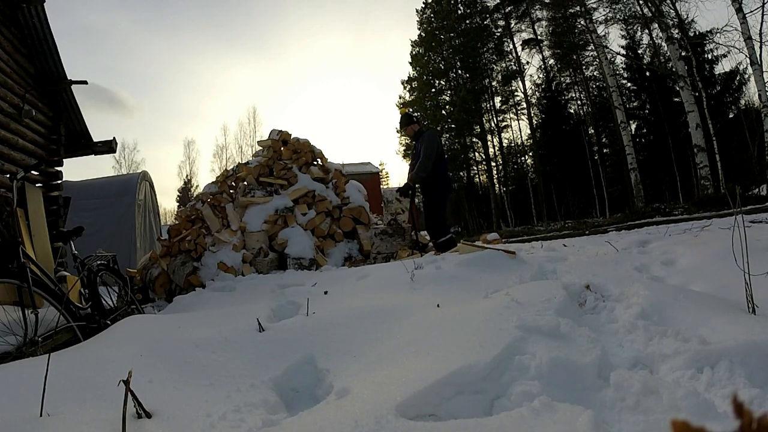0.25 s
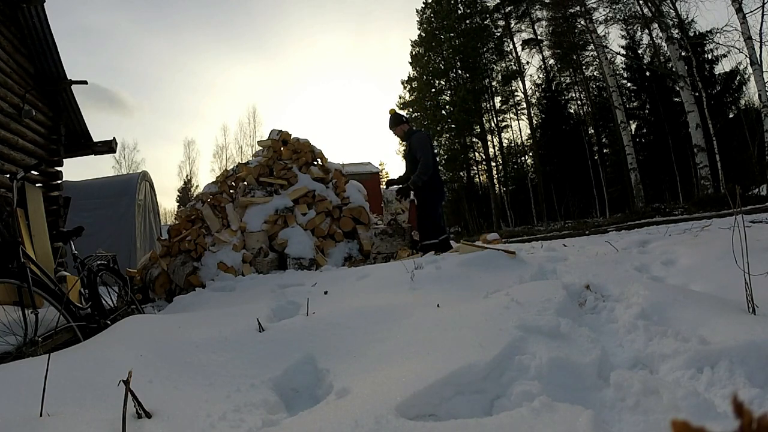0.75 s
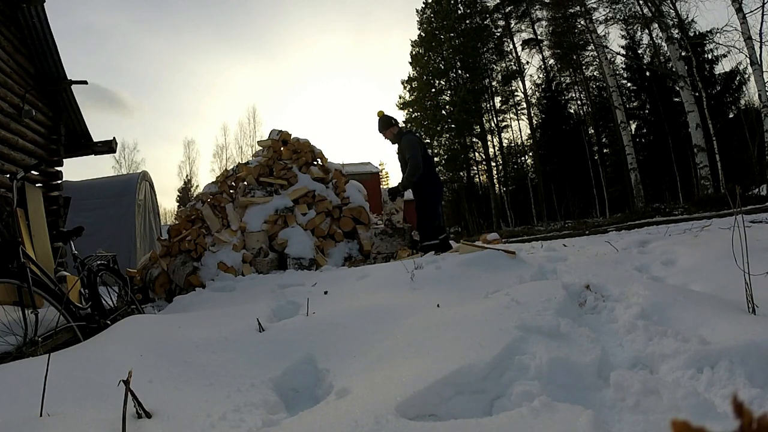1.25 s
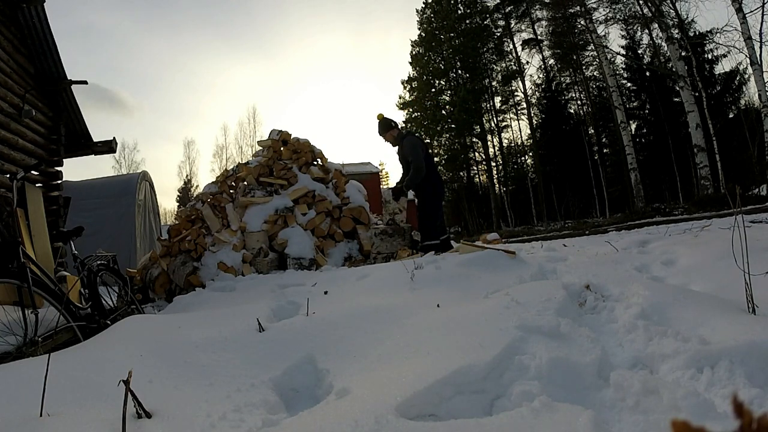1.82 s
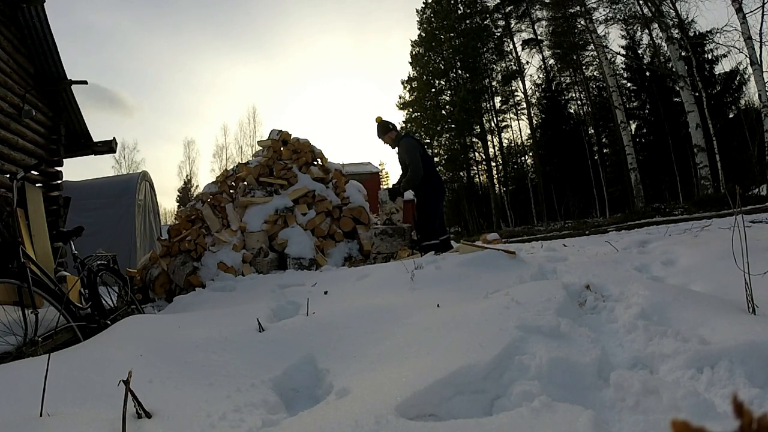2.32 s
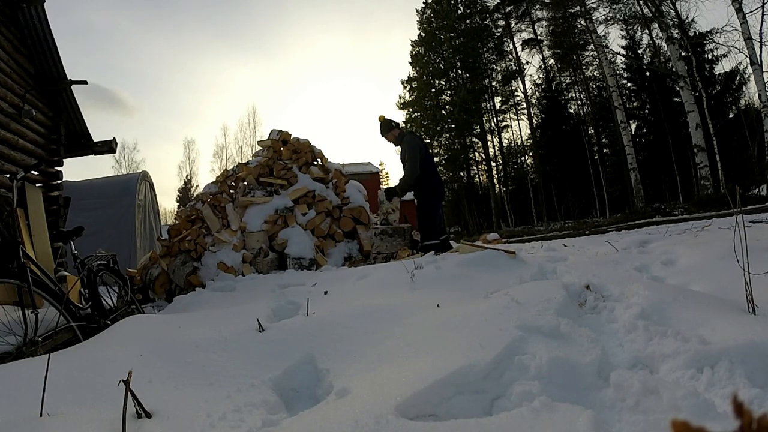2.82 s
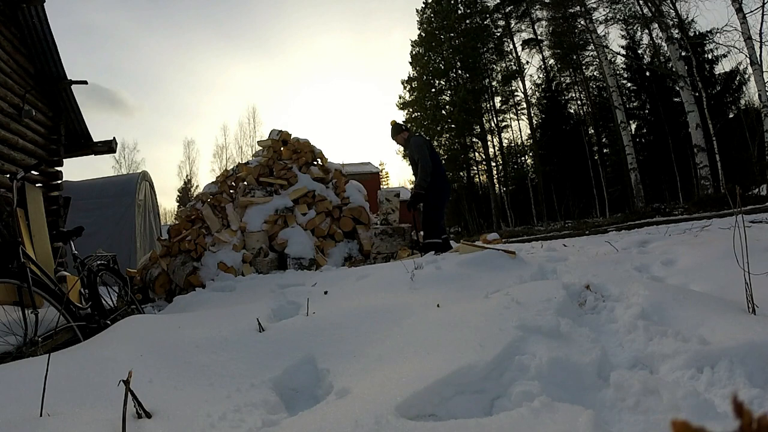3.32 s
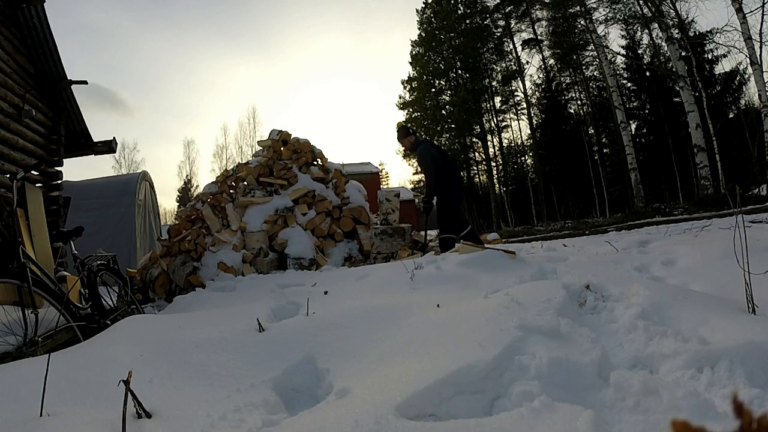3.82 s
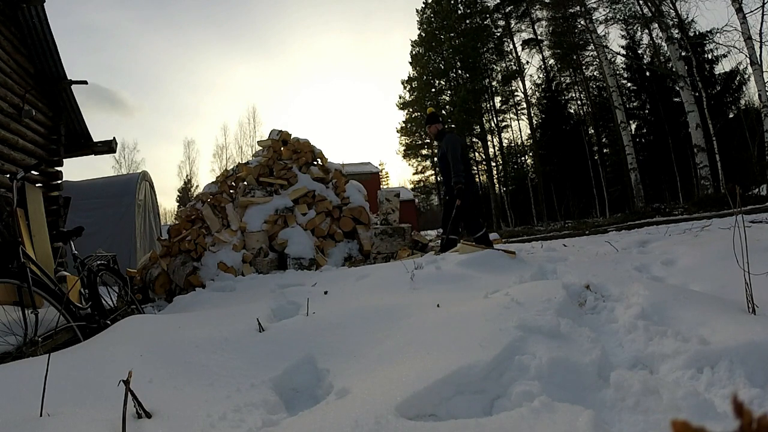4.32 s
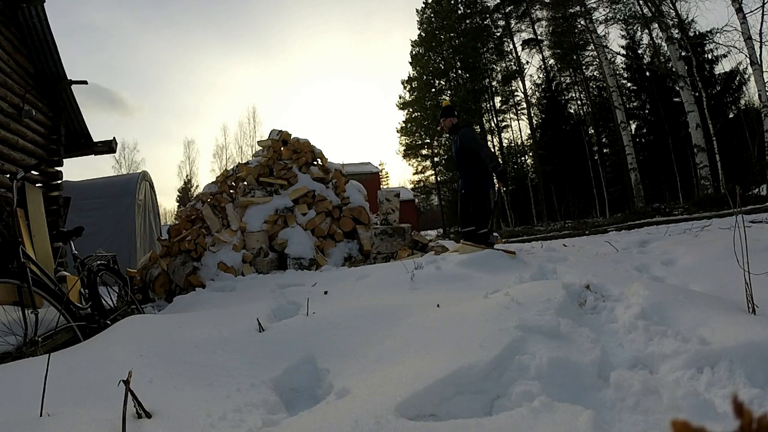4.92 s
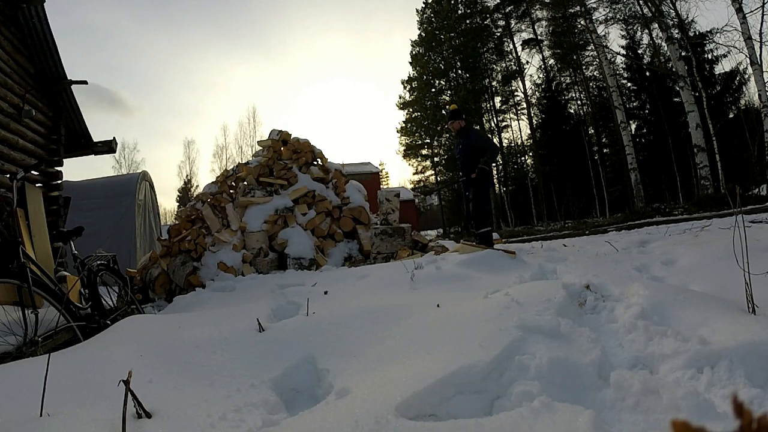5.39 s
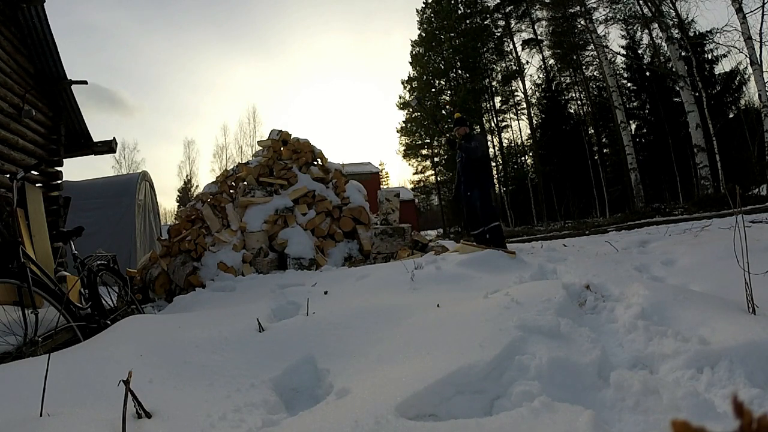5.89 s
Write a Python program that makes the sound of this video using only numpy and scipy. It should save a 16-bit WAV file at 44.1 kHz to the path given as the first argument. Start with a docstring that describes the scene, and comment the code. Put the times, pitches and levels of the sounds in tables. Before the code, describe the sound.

A quiet outdoor wash of air with a faint low stir of wind runs throughout. In the first second and a half there are only soft bumps and scuffs in snow and a few thin, falling bird chirps. At about 1.6 seconds an axe splits a log some metres away: one sharp, tearing crack with a brief woody ring and a short echo off the trees. At 1.8 a heavy piece thuds deeply into snow. Softer bumps, wood ticks and scuffs follow until 3 seconds, with a few muffled boot steps between 4 and 5. From 1.8 to 5 seconds a small bird faintly alternates a clear high whistle with a buzzy note, five times over. Distant, lower fluted notes come between 2.4 and 3.6. From 5 seconds a very faint twitter and thin high peeps carry on to the end, just after 6.

```python
"""A snowy yard at the edge of a forest, where an axe splits a log some metres away.
The wood cracks, tears and rings, then heavy pieces thud into the snow amid soft scuffs and bumps.
A small bird alternates a whistle with a buzz; others add thin chirps, a twitter and far fluting,
all gliding near-sine tones. Trunks scatter a short tail over a quiet bed of air."""
import sys
import numpy as np
from scipy import signal
from scipy.fft import rfft, irfft
from scipy.io import wavfile

SR = 44100
rng = np.random.default_rng(int(sys.argv[2]) if len(sys.argv) > 2 else 0)


def wav_record(signal):
    """Record a signal, one row per channel, as 16-bit PCM in the file named by sys.argv[1]."""
    frames = np.transpose(np.atleast_2d(signal))
    bounded = np.clip(frames, -1, 1)
    # unit amplitude maps onto the largest positive 16-bit level
    quanta = np.round(bounded * 32767).astype(np.int16)
    wavfile.write(sys.argv[1], SR, quanta)


N = 271215

# The split (blade bites, log bursts, halves part, last fibres rip twice): delay_s, level_db, decay_s
SPLIT_STAGES = [(0, -20.5, 0.001), (.0011, -16.5, 0.0012), (.0023, -30, 0.004), (0.0106, -28.5, .005),
                (.014, -33, 0.0041)]
# Ticks of loose wood: start_s, level_db
WOOD_TICKS = [(1.458, -53), (1.816, -49.5), (2.223, -51), (2.897, -55)]
# Tone of cracking wood: frequency_hz, gain_db
CRACK_EQ = [(100, -17), (430, 4), (700, -16.5), (1080, -3.5), (1350, -7), (1650, -5.5), (2100, 1.5),
            (2400, -1.5), (3400, 1), (4400, -11), (5400, -5.5), (7200, -13), (9000, -20), (15000, -38)]
# Ring of the log and axe: pitch_hz, level_db, t60_s
LOG_MODES = [(397.5, -1.5, 0.19), (492, 4.5, 0.053), (1074, 1.5, 0.088), (1131, 3, 0.063), (1603, 1, 0.064),
             (2012, 3.5, 0.049), (2150, -13, 0.066), (2280, -10, 0.036), (2770, -17, 0.045),
             (2740, -30, 0.039), (2770, 1, 0.033), (3170, -9, 0.034), (3430, -15, 0.036), (3380, -7, .04),
             (3480, -9, 0.034), (3820, -12, 0.04), (5130, -6, 0.097), (5800, -4, 0.055), (6966, -5, 0.063)]
# Wood and boots landing in snow: start_s, level_db, first_pitch_hz
LANDINGS = [(.214, -53, 58), (.429, -42, 211), (.441, -35, 62.5), (0.705, -51, 274), (1.412, -46, 95),
            (1.587, -44, 120), (1.8161, -18, 129), (2.014, -36, 55.7), (2.296, -40.5, 112),
            (2.345, -37, 134), (2.547, -38.5, 88), (2.877, -46, 86), (2.975, -48.5, 93),
            (3.984, -40.5, 151), (4.542, -47.5, 52.5), (4.771, -51, 50), (5.098, -47, 40),
            (5.748, -56, 250)]
# Tone of snow packed by an impact: frequency_hz, gain_db
PACKING_EQ = [(30, -32), (150, -13), (240, -1), (330, -28), (420, 9.5), (530, -10.5), (750, -5.5),
              (1000, -52), (1500, -41), (6000, -28), (15000, -48)]
# Scuffs of wood, snow and clothing: centre_s, level_db, half_width_s, powder_share
SCUFF_SWELLS = [(.244, -64.5, 0.054, 0.4), (1.002, -61.5, 0.019, 0.94), (1.16, -62.5, 0.17, 0.01),
                (1.455, -53, 0.024, 0.04), (1.585, -51.5, 0.011, 0.03), (1.847, -58, 0.043, .07),
                (2.02, -56.5, 0.073, 0.16), (2.312, -58.5, 0.063, 0.18), (2.566, -58, 0.027, 0.53),
                (6.095, -61, 0.017, 1)]
# Tone of a scuff's crunch: frequency_hz, gain_db
CRUNCH_EQ = [(100, 6.5), (420, -7), (800, 3), (1100, -9.5), (1400, -5), (2200, -3.5), (3300, -5),
             (4300, -11), (6200, -19), (9000, -24), (15000, -31)]
# Tone of powdery hiss: frequency_hz, gain_db
POWDER_EQ = [(100, -10), (1000, -1.5), (2500, -4), (6000, -2.5), (9000, -10), (15000, -20.5)]
# The near bird's clear notes: start_s, length_s, level_db, pitch_hz
WHISTLE_NOTES = [(1.765, 0.17, -55.5, 3880), (2.422, 0.19, -55, 3790), (3.048, 0.23, -59.5, 3845),
                 (3.702, 0.18, -54, 3766), (4.402, 0.16, -51, 3743)]
# Its buzzed answers: start_s, length_s, level_db, pitch_hz
BUZZ_NOTES = [(2.075, 0.19, -57, 4750), (2.719, 0.18, -58, 4640), (3.348, 0.197, -58, 4650),
              (4.058, 0.16, -54.5, 4844), (4.723, 0.16, -54.5, 4944)]
# Thin falling chirps: start_s, length_s, level_db, pitch_hz
CHIRP_NOTES = [(.445, 0.096, -69, 6980), (0.613, .12, -69.5, 6560), (.805, .05, -76, 6100),
               (4.366, .093, -73, 7100), (4.526, 0.1, -71, 6700), (5.218, 0.11, -70, 6850),
               (5.415, 0.089, -77, 7550), (5.417, 0.056, -74, 6250), (5.59, .107, -75, 7270),
               (5.77, .087, -78, 6860)]
# Arched peeps: start_s, length_s, level_db, pitch_hz, glide_hz, arch_hz
PEEP_NOTES = [(5.046, 0.075, -69, 7000, 5, 250), (5.845, 0.025, -65, 8130, -300, 700),
              (6.098, 0.027, -58, 7020, 1900, 496)]
# Far fluted notes: start_s, level_db, pitch_hz, glide_hz
FLUTED_NOTES = [(2.43, -70.5, 2190, -170), (2.738, -63.5, 1930, -160), (3.109, -70, 2780, 110),
                (3.283, -72, 2700, 50), (3.53, -67.5, 2080, 140)]
# Decay of the forest's tail: frequency_hz, t60_s
FOREST_DECAY = [(100, .3), (1000, 0.69), (4000, 0.5), (8000, 0.34), (15000, 0.11)]
# Tone of the far wash of air: frequency_hz, gain_db
AIR_EQ = [(12, -35), (20, 0.5), (49, 2), (90, -0.5), (597, -8), (3750, -19.5), (4810, -21.5),
          (13900, -36.5), (15500, -42)]


def axe(chop_s=1.606, snap_db=11, fibre_db=-3, ring_db=-33, tick_decay_s=0.0052):
    """Each fracture is one snap and a burst of tearing fibres, and sets the log ringing."""
    t = np.arange(SR // 4) / SR
    snaps, tearing = np.zeros((2, N))
    cracks = [(chop_s + delay, db, decay) for delay, db, decay in SPLIT_STAGES]
    cracks += [(s, db, tick_decay_s) for s, db in WOOD_TICKS]
    for s, db, decay in cracks:
        add(snaps, s, amp([db + snap_db]) / (1 + (decay / .004) ** 2))  # slow tears barely snap
        add(tearing, s, amp(db + fibre_db) * np.exp(-t / decay))
    crack = signal.oaconvolve(snaps + tearing * rng.standard_normal(N), tight_impulse(CRACK_EQ))[:N]
    return crack + amp(ring_db) * signal.oaconvolve(snaps, log_ring())[:N]


def log_ring():
    """One tap on the log: its modes ring and quickly die."""
    t = np.arange(SR // 4) / SR
    return sum((-1) ** k * amp(db - 60 * t / t60) * np.sin(2 * np.pi * hz * t)
               for k, (hz, db, t60) in enumerate(LOG_MODES))


def thuds(snow_hz=50, knock_hz=218, knock_db=-8, packing_db=-20, rock_hz=93.3, rock_db=-21.5):
    """A weight sinks unevenly into snow: a sagging low boom, hollow knock, muffled crunch, rocking."""
    t = np.arange(SR // 2) / SR
    lows, pressure = np.zeros((2, N))
    knock = amp(knock_db) * np.exp(-t / 0.016) * np.sin(2 * np.pi * knock_hz * t)
    knock *= 1 - np.exp(-t / 0.0031)
    rock_swell = amp(rock_db) * t / 0.068 * np.exp(1 - t / 0.068)
    knots = t[::SR // 200]
    for s, db, first_hz in LANDINGS:
        firmness = first_hz / 140  # harder landings start higher, rise faster, knock and crunch more
        punch = firmness ** 2.03
        age = t / 0.011 * firmness ** 0.61  # 1 at the boom's peak
        sunk = 1 - np.exp(-(age / 2.4) ** 3.56)  # the pitch holds, then sags
        last_hz = min(first_hz, max(0.31 * first_hz, snow_hz))  # no sag below the snow's own pitch
        give = np.interp(t, knots, rng.standard_normal(len(knots)))
        hz = (first_hz + (last_hz - first_hz) * sunk) * np.exp(0.14 * (0.52 + sunk) * give)
        boom = (age * np.exp(1 - age)) ** 0.64 * np.sin(phase_of(hz))
        rocking = rock_swell * np.sin(phase_of(rock_hz * np.exp(0.24 * give)))
        add(lows, s, amp(db) * (boom + punch * knock + rocking))
        add(pressure, s, amp(db + packing_db) * punch * np.exp(-age) * (1 - np.exp(-t / 0.00061)))
    return lows + pressure * noise(PACKING_EQ)


def scuffs(grain_db=2.5, wood_db=-3):
    """Short swells of grainy crunch, rubbed wood and powdery hiss."""
    t, out = np.arange(N) / SR, np.zeros(N)
    rubbed = unit_rms(signal.oaconvolve(rng.standard_normal(N), log_ring())[:N])
    crunch = unit_rms(noise(CRUNCH_EQ) + amp(wood_db) * rubbed)
    powder = noise(POWDER_EQ)
    for s, db, half_width, share in SCUFF_SWELLS:
        swell = amp(db) * np.exp(-((t - s) / half_width) ** 2 / 2)
        out += swell * (np.sqrt(1 - share) * crunch + np.sqrt(share) * powder)
    return out * unit_rms(amp(grain_db * drift(530)))


def bird_note(length_s, db, pitch_hz, glide_hz=0, arch_hz=0, hook_hz=0, scoop_hz=0, trill_depth_hz=0,
              trill_rate_hz=235, waver=.002, flutter_db=1, fade_db=0, taper=.35, octave_db=-38):
    """A bird's voice: a near sine on a gliding, arched pitch; a fast uneven trill makes it buzz."""
    t = np.arange(int(length_s * SR)) / SR
    progress = t / t[-1]
    pitch_jitter, level_jitter, rate_jitter, depth_jitter = (
        np.interp(progress, np.linspace(0, 1, 24), row) for row in rng.standard_normal((4, 24)))
    hz = pitch_hz + glide_hz * (progress - .5) - arch_hz * (2 * progress - 1) ** 2
    hz -= scoop_hz * np.exp(-t / 0.0052) + hook_hz * progress ** 20  # scoop in, hook down at the end
    trill = (1 + .25 * depth_jitter) * np.sin(phase_of(trill_rate_hz * (1 + .07 * rate_jitter)))
    phase = phase_of(hz * (1 + waver * pitch_jitter) + trill_depth_hz * trill)
    tone = np.sqrt(2) * (np.sin(phase) + amp(octave_db) * np.sin(2 * phase))
    level = amp(db + flutter_db * level_jitter - fade_db * progress ** 2)
    return level * signal.windows.tukey(len(t), taper) * tone


def whistles():
    """A small bird's clear note scoops up, rises slightly and fades."""
    return phrase(WHISTLE_NOTES, glide_hz=35, arch_hz=16, scoop_hz=80,
                  waver=.0012, flutter_db=2.5, fade_db=7)


def buzzes():
    """The same bird answers each whistle with a sagging, fast-trilled buzz."""
    return phrase(BUZZ_NOTES, glide_hz=-269, arch_hz=30, scoop_hz=840, trill_depth_hz=237,
                  waver=.007, flutter_db=1.5, fade_db=5, taper=0.12)


def twitter(start_s=5.05, count=8, note_s=.064, level_db=-69, pitch_hz=4900):
    """A faint run of buzzy notes gets slower, purer and softer; their glide turns from up to down."""
    out, s = np.zeros(N), start_s
    for k in range(count):
        rasp = 1 / (1 + (2 * k / count) ** 6)
        add(out, s, bird_note(note_s, level_db - 4.5 * (1 - rasp), pitch_hz, glide_hz=300 * (rasp - .5),
                              arch_hz=70, trill_depth_hz=221 * rasp, waver=0.015, taper=0.28))
        s += .119 + k * 0.0051
    return out


def chirps():
    """Thin high calls from the trees: falling chirps that end in a hook, and short arched peeps."""
    falling = phrase(CHIRP_NOTES, glide_hz=-777, hook_hz=1000, scoop_hz=-300,
                     waver=0.0047, flutter_db=-1, taper=0.13, octave_db=-24)
    peeps = phrase(PEEP_NOTES, scoop_hz=1100, waver=0.0044, flutter_db=-2, taper=.2, octave_db=-22)
    return falling + peeps


def far_bird(note_s=0.1, direct_db=-0.5, forest_db=-7):
    """Low fluted notes from deep in the forest, blurred by its echo."""
    out = np.zeros(N)
    for s, *row in FLUTED_NOTES:
        add(out, s, bird_note(note_s, *row, arch_hz=-47, waver=0.0048, flutter_db=4, taper=.5))
    return amp(direct_db) * out + amp(forest_db) * forest(out)


def scatter(x, delay_s, spread_s):
    """A rough surface, logs or branches, returns one smeared echo."""
    t = np.arange(SR // 10) / SR
    taps = reflections(len(t), per_second=1500) * np.exp(-t / spread_s)
    out = np.zeros(N)
    add(out, delay_s, signal.fftconvolve(x, taps / (np.linalg.norm(taps) + 1e-12)))
    return out


def forest(x, build_s=0.0087):
    """Trunks scatter the sound into a thin tail, each band dying at its own speed."""
    hz, t, bands = signal.stft(reflections(SR, per_second=2000), SR, nperseg=256)
    envelope = amp(-60 * t / curve(FOREST_DECAY, hz)[:, None]) * (1 - np.exp(-t / build_s))
    tail = signal.istft(bands * envelope, SR, nperseg=256)[1]
    return signal.fftconvolve(x, tail / np.linalg.norm(tail))[:N]


def air(wash_db=-60, rumble_db=-65):
    """The bed: a nearly steady far wash and a lumpy low stir of wind."""
    rumble = noise([(10, -20), (30, 3), (60, -6.5), (120, -10.5), (300, -36), (2000, -80)])
    wash = noise(AIR_EQ) * amp(1.1 * drift(3.7))
    return amp(wash_db) * wash + amp(rumble_db) * unit_rms(rumble * amp(1.6 * drift(39)))


def amp(db):
    """Decibels to gain."""
    return 10 ** (np.asarray(db) / 20)


def unit_rms(x):
    """Scales to rms 1."""
    return x / np.sqrt(np.mean(x ** 2) + 1e-20)


def phase_of(hz):
    """Running phase of a moving pitch."""
    return 2 * np.pi * np.cumsum(hz) / SR


def curve(points, hz):
    """Reads a table on a log-frequency axis."""
    f, value = np.transpose(points)
    return np.interp(np.log(hz + 1), np.log(f + 1), value)


def add(mix, s, sound):
    """Lays a sound into the mix at s seconds."""
    part = mix[max(round(s * SR), 0):][:len(sound)]
    part += sound[:len(part)]


def phrase(notes, **voice):
    """Lays a table of bird notes on one track, all in one voice."""
    out = np.zeros(N)
    for s, *row in notes:
        add(out, s, bird_note(*row, **voice))
    return out


def reflections(size, per_second):
    """Sparse random echo taps."""
    return rng.standard_normal(size) * (rng.random(size) < per_second / SR)


def noise(eq):
    """Noise of rms 1 shaped by an EQ curve."""
    gain = amp(curve(eq, np.fft.rfftfreq(N, 1 / SR)))
    return unit_rms(irfft(rfft(rng.standard_normal(N)) * gain, N))


def drift(rate_hz):
    """Smooth random modulation of rms 1, rolling off above rate_hz."""
    gain = np.exp(-(np.fft.rfftfreq(N, 1 / SR) / rate_hz) ** 2)
    return unit_rms(irfft(rfft(rng.standard_normal(N)) * gain, N))


def tight_impulse(eq, size=2048):
    """The shortest impulse response with this EQ curve, of energy 1."""
    log_gain = np.log(amp(curve(eq, abs(np.fft.fftfreq(size, 1 / SR)))))
    response = np.fft.ifft(np.exp(np.conj(signal.hilbert(log_gain)))).real
    return response / np.linalg.norm(response)


def scene():
    """The chop echoes off the woodpile; birdsong comes through branches and lingers in the forest."""
    chop, whistle = axe(), whistles()
    song = buzzes() + twitter() + chirps()
    woodpile = amp(-27.5) * scatter(chop, delay_s=.0525, spread_s=0.013)
    yard = chop + woodpile + amp(-25.5) * forest(chop) + thuds() + scuffs()
    branches = amp(-7) * scatter(song, delay_s=.002, spread_s=.004)
    birds = amp(-1.65) * song + branches + amp(-0.2) * whistle
    bird_tail = forest(amp(-10) * song + amp(-15.5) * whistle)
    return (yard + birds + bird_tail + far_bird() + air())[None]


def record(dry, low_hz=24, high_hz=15600):
    """A low cut trims the deepest bass; a steep high cut takes off the very top."""
    thin = signal.sosfilt(signal.butter(2, low_hz, "highpass", fs=SR, output="sos"), dry)
    high_cut = signal.firwin(255, high_hz, window=("kaiser", 8), fs=SR)
    return signal.oaconvolve(thin, high_cut[None], "same")


dry = scene()
out = record(dry)
wav_record(out)
```